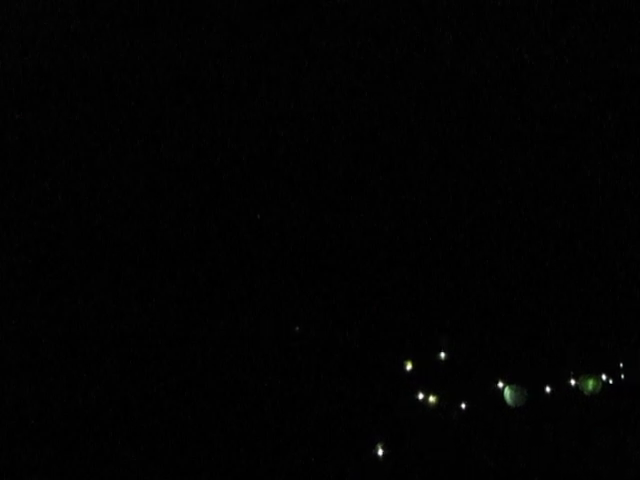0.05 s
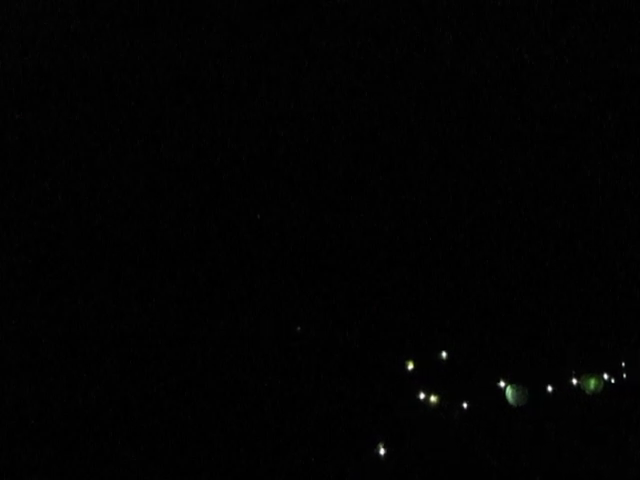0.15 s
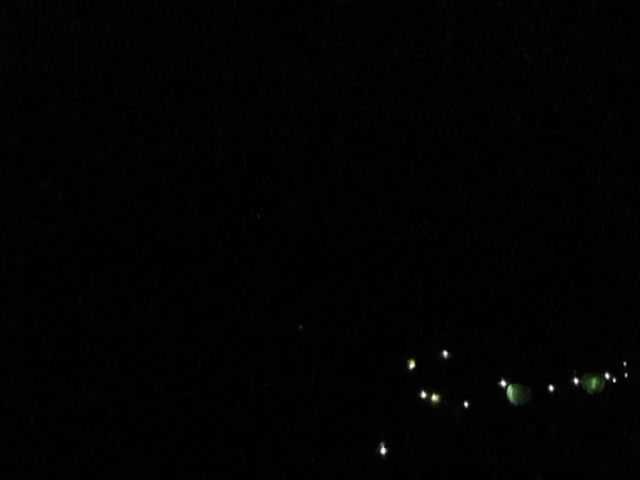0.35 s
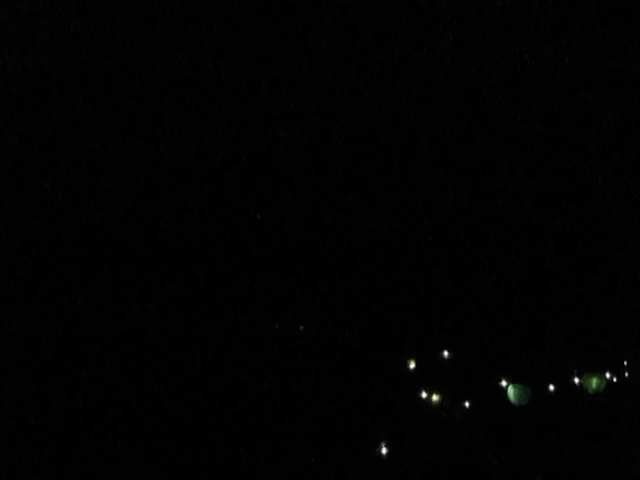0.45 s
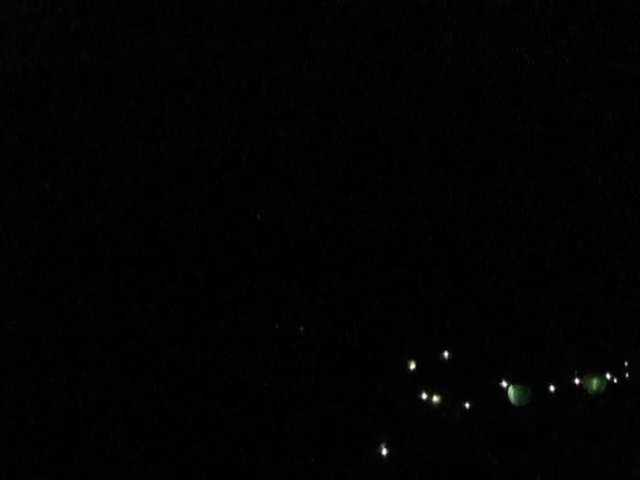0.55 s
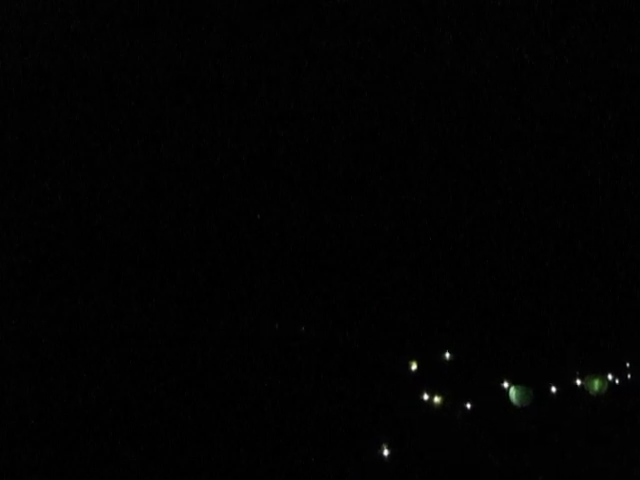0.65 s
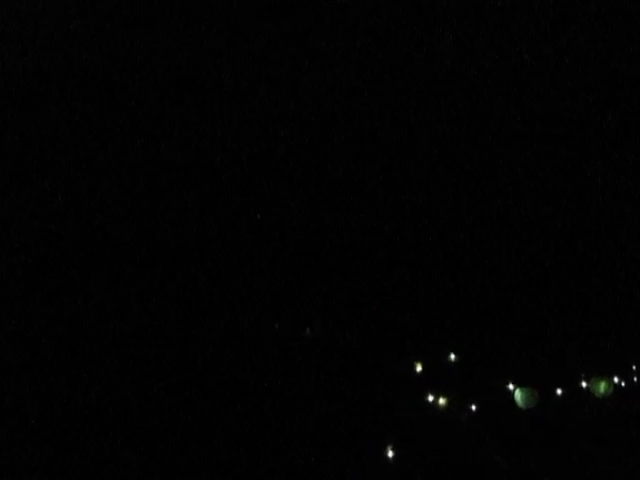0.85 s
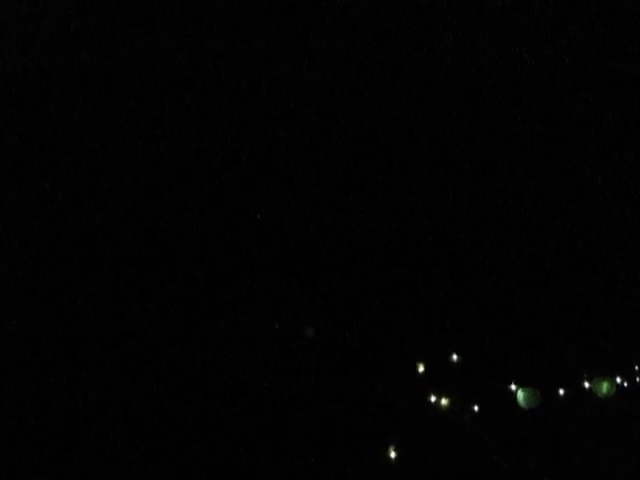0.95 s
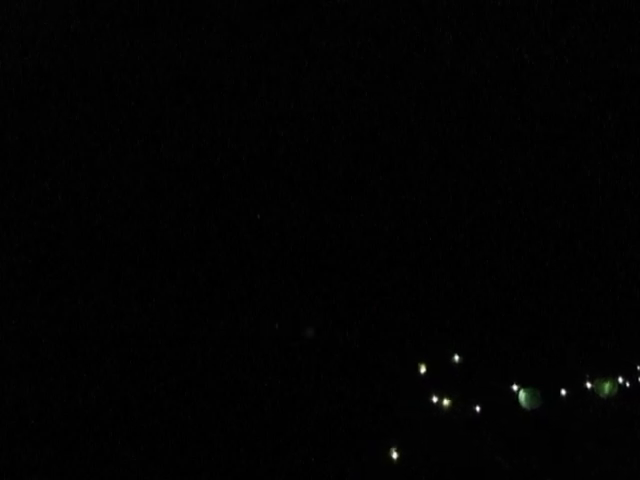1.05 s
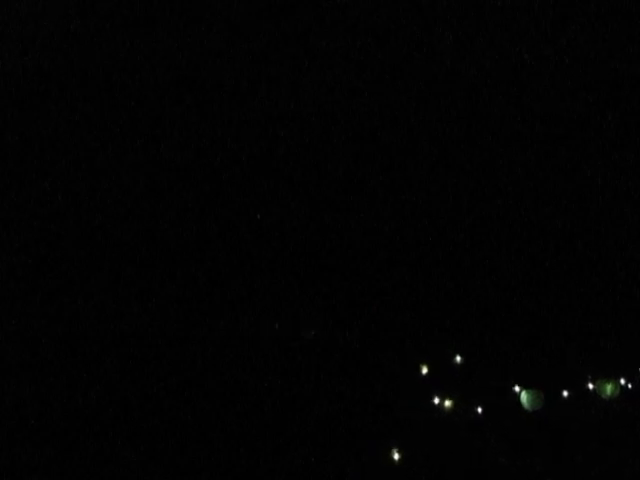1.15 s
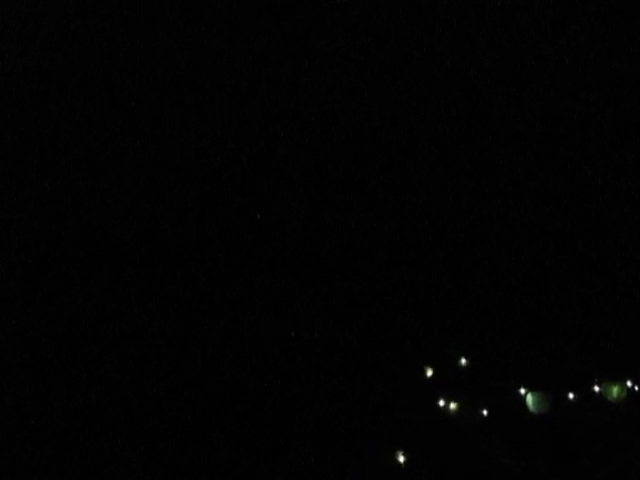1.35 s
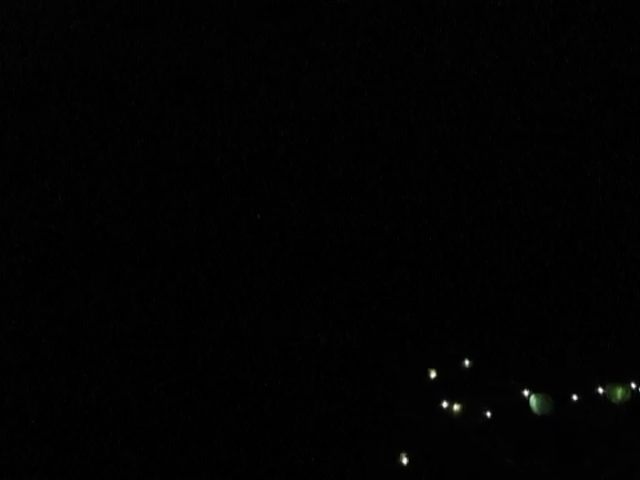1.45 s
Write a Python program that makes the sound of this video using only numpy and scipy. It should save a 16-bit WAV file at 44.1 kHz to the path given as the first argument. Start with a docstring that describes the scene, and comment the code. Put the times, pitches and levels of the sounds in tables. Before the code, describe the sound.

A fox gives one harsh bark outdoors at night, echoing over a faint hiss.

```python
"""A fox barks at night

One harsh bark in the open, a little to the right. The voice scoops up to about 1 kHz, a second,
higher vibration in the throat mixes with it over a rasp, and it ends in a softer whine.
Distant slopes throw the cry back and trees scatter it into a long tail.
Beneath it lie a quiet night hiss, two faint rustles and a tick."""
import sys
import numpy as np
from scipy import signal
from scipy.fft import rfft, irfft, next_fast_len
from scipy.io import wavfile
from scipy.ndimage import map_coordinates

SR = 44100
rng = np.random.default_rng(int(sys.argv[2]) if len(sys.argv) > 2 else 0)


def materialize(psi):
    """Save the field psi as 16-bit PCM at rate SR to the path in sys.argv[1].

    A 1-D psi becomes a single channel; in a 2-D psi each row is a channel.
    """
    bounded = np.clip(np.atleast_2d(psi).T, -1, 1)
    quanta = np.round(bounded * 32767).astype(np.int16)
    wavfile.write(sys.argv[1], SR, quanta)


N = 66150  # 1.5 seconds

# Tone of the night hiss. Each row: frequency in Hz, relative level in dB.
NIGHT_COLOUR = [(20, -1.5), (45, -5), (80, -1.5), (120, -8), (240, -6), (470, -12.5), (750, -11.5),
                (1120, -6.5), (1450, -16.5), (2400, -20), (5000, -23), (9500, -27), (15500, -35.5)]
# How alike the hiss is in both ears. Each row: frequency in Hz, likeness from 0 to 1.
NIGHT_LIKENESS = [(60, .05), (200, 0.37), (500, 0.25), (1050, 0.15), (2000, 0.28), (4000, 0.027),
                  (12000, 0)]
# Where the hiss leans. Each row: frequency in Hz, left minus right in dB.
NIGHT_BALANCE = [(60, 2.5), (300, 1.5), (1000, -1), (4000, 0.6), (12000, .5)]
# Small noises. Each row: peak time and fade time in seconds, pitch in Hz, width in octaves, level in dB.
RUSTLE_BURSTS = [(0.09, 0.038, 3720, 0.7, -64.5), (1.24, 0.039, 11000, .6, -71),
                 (1.484, 0.0015, 11500, .17, -55.5)]
# How long the trees ring. Each row: frequency in Hz, seconds to fade by 60 dB.
TREES_FADE = [(700, 1.45), (1050, 1.23), (1800, 1.14), (2800, 0.99), (4500, 1.19), (9000, 0.77)]
# Tone of that tail. Each row: frequency in Hz, gain in dB.
TREES_TONE = [(700, -2), (1050, 0.024), (1800, 0), (3300, 0), (4500, -3.5), (6300, 9.5), (9000, 3.5)]
# How alike the tail is in both ears. Each row: frequency in Hz, likeness from 0 to 1.
TREES_LIKENESS = [(700, 1), (1100, .88), (1800, 0.75), (2600, 0.025), (4400, 0.091), (9000, 0.22)]
# Far echoes. Each row: delay in seconds, gain in dB, smear in seconds, treble cutoff in Hz.
SLOPE_ECHOES = [(.15, -18, .04, 6000), (.2, -15, .05, 1500), (.385, -19.5, .04, 1510), (.66, -31, .1, 1600),
                (.86, -39.5, .05, 2200)]
# The main voice. Each row: time in seconds, pitch in Hz, level in dB.
VOICE_PATH = [(.2, 804.6, -60), (.218, 849, -34.5), (.234, 923.7, -39.5), (.25, 1002, -30), (.27, 996, -32),
              (.292, 1012, -26), (.345, 1047, -30), (.385, 1083, -39.5), (.41, 1094, -44.5),
              (.455, 1101, -42.5), (.492, 1071, -38), (.545, 1047, -34), (.585, 1035, -55)]
# The higher vibration. Each row: time in seconds, pitch in Hz, level in dB.
WHISTLE_PATH = [(.222, 1735, -48), (.24, 1771, -41), (.253, 1769, -29.5), (.29, 1794, -30.5),
                (.318, 1790, -28.5), (.345, 1799, -45.5), (.36, 1809, -34), (.402, 1797, -37),
                (.425, 1760, -45)]
# Overtones and mixing tones. Each row: the multiples of voice, whistle and growl pitch to add up.
MIX_RECIPES = [(2, 0, 0), (1, 1, 0), (3, 0, 0), (1, 0, -1), (0, 1, -1), (0, 1, -2), (1, 1, -2), (0, 2, -1),
               (1, 2, -2), (1, 2, -1)]
# The gain in dB of each of those tones.
MIX_GAINS = [-18.5, -11.5, -19.5, -18, -13, -13, -17, -27, -20.5, -22]
# The throat's rasp. Each row: time in seconds, level in dB, extra treble in dB.
RASP_PATH = [(.2, -61, -18), (.216, -44.5, 0), (.235, -34, -6), (.265, -33.5, 3), (.31, -34, 1.5),
             (.36, -33, 1.5), (.4, -30, -7), (.44, -38, -2), (.47, -42.5, 1)]
# Tone of the rasp. Each row: frequency in Hz, relative level in dB.
THROAT_COLOUR = [(300, -67), (620, -32.5), (730, -13.5), (850, 0.5), (960, 0.5), (1120, 2), (1270, -1),
                 (1460, -7.5), (1680, 1), (1900, 2), (2150, -2), (2400, -7), (2900, -6), (3200, -9),
                 (3800, -8), (4450, -16.5), (4850, -21), (5800, -30.5), (7500, -51.5), (14000, -69)]
# Where the cry leans. Each row: frequency in Hz, left minus right in dB.
CRY_BALANCE = [(800, 1), (1100, 0.6), (1800, -2), (2800, -2), (4400, 0.5)]
# How far the right ear is ahead. Each row: frequency in Hz, lead in radians.
RIGHT_LEAD = [(700, .22), (1050, 0.37), (1800, 0.41), (4400, 0.81)]


def amp(db):
    """Turn decibels into a gain."""
    return 10 ** (np.asarray(db) / 20)


def unit(x):
    """Scale a sound to an average power of 1."""
    return x / np.sqrt(np.mean(x ** 2) + 1e-20)


def along(points, hz):
    """Read between a table's rows on a log frequency scale."""
    freqs, values = np.transpose(points)
    return np.interp(np.log(hz + 1), np.log(freqs + 1), values)


def curves(rows):
    """One value per sample for each column after the time."""
    times, *columns = np.transpose(rows)
    return [np.interp(np.arange(N) / SR, times, column) for column in columns]


def gate(rows, attack_s=0.0098, release_s=0.03):
    """Fade in before the first row's time and out after the last."""
    t = np.arange(N) / SR
    return np.exp(np.minimum(t - rows[0][0], 0) / attack_s - np.maximum(t - rows[-1][0], 0) / release_s)


def wobble(per_second=240):
    """A smooth, quickly changing random curve."""
    return map_coordinates(rng.standard_normal(N // 8), [np.arange(N) * per_second / SR], mode="wrap")


def filtered(x, response):
    """Give each frequency the gain that response returns for it."""
    size = next_fast_len(N + SR // 2)
    return irfft(rfft(x, size) * response(np.fft.rfftfreq(size, 1 / SR)), size)[..., :N]


def panned(points, hz):
    """Left and right gains for a level difference."""
    return amp(np.outer([.5, -.5], along(points, hz)))


def noise_pair(likeness):
    """White stereo noise with a given likeness of left and right."""
    def shares(hz):
        angle = np.arccos(np.clip(along(likeness, hz), -1, 1)) / 2
        return np.array([np.cos(angle), np.sin(angle)])
    mid, side = filtered(rng.standard_normal((2, N)), shares)
    return np.array([mid + side, mid - side])


def night(level_db=-54):
    """The steady hiss and low murmur of the countryside."""
    colour = lambda hz: amp(along(NIGHT_COLOUR, hz)) * panned(NIGHT_BALANCE, hz)
    return unit(filtered(noise_pair(NIGHT_LIKENESS), colour)) * amp(level_db)


def rustles():
    """Soft bursts of noise close by; the shortest is a tick."""
    t, out = np.arange(N) / SR, np.zeros((2, N))
    for peak_s, fade_s, centre_hz, octaves, db in RUSTLE_BURSTS:
        band = lambda hz: np.exp(-(np.log2((hz + 1) / centre_hz) / octaves) ** 2)
        hiss = unit(filtered(rng.standard_normal((2, N)), band))
        out += hiss * amp(db) * np.exp(-((t - peak_s) / fade_s) ** 2)
    return out


def slopes(cry, copies=5):
    """Each far slope returns a dull cluster of copies of the cry."""
    out = np.zeros(N)
    sizes = np.exp(-np.arange(copies) / 2)
    for delay, db, smear, dull_hz in SLOPE_ECHOES:
        lags = delay + smear * (np.arange(copies) + rng.random(copies)) / copies
        cluster = lambda hz: sizes @ np.exp(-2j * np.pi * np.outer(lags, hz)) / np.linalg.norm(sizes)
        out += amp(db) * filtered(cry, lambda hz: cluster(hz) / np.sqrt(1 + (hz / dull_hz) ** 6))
    return out


def trees(cry, gain_db=-6.5, build_s=0.012):
    """Trees scatter the cry into a smooth tail whose treble dies first."""
    hz, t, bands = signal.stft(noise_pair(TREES_LIKENESS), SR, nperseg=256)
    fade = amp(-60 * t / along(TREES_FADE, hz)[:, None])
    build = 1 - np.exp(-t / build_s)
    tail = signal.istft(bands * fade * build, SR, nperseg=256)[1][:, :N]
    tail = filtered(tail / np.linalg.norm(tail[0]), lambda hz: amp(along(TREES_TONE, hz)))
    return amp(gain_db) * signal.fftconvolve(cry[None], tail, axes=1)[:, :N]


def unsteady_phase(hz, jitter):
    """The running angle of a vibration whose pitch wavers by the share jitter."""
    return 2 * np.pi * np.cumsum(hz * (1 + jitter * wobble())) / SR


def vibration(rows, shimmer_db=1.55):
    """Phase and size of one unsteady vibration in the throat."""
    hz, db = curves(rows)
    phase = unsteady_phase(hz, jitter=0.0091)
    return phase, np.sqrt(2) * amp(db + shimmer_db * wobble()) * gate(rows)


def rasp(voice_phase, pulsing=0.79, flutter_db=0.5, treble_hz=2600):
    """Noise in the throat that puffs once per cycle of the voice."""
    puffs = rng.standard_normal(N) * (1 + pulsing * np.cos(voice_phase)) * amp(flutter_db * wobble())
    breath = unit(filtered(puffs, lambda hz: amp(along(THROAT_COLOUR, hz))))
    body = filtered(breath, lambda hz: 1 / (1 + (hz / treble_hz) ** 6))
    level_db, treble_db = curves(RASP_PATH)
    return (body + amp(treble_db) * (breath - body)) * amp(level_db) * gate(RASP_PATH)


def fox():
    """Two vibrations and a slow growl mix into a cluster of tones over the rasp."""
    voice, voice_size = vibration(VOICE_PATH)
    whistle, whistle_size = vibration(WHISTLE_PATH)
    growl = unsteady_phase(hz=168, jitter=.08)  # slow flapping of the throat
    tones = voice_size * np.sin(voice) + whistle_size * np.sin(whistle)
    for (n_voice, n_whistle, n_growl), db in zip(MIX_RECIPES, MIX_GAINS):
        size = (voice_size ** n_voice * whistle_size ** n_whistle) ** (1 / (n_voice + n_whistle))
        tones += amp(db) * size * np.sin(n_voice * voice + n_whistle * whistle + n_growl * growl)
    return tones + rasp(voice)


def scene():
    """The cry and its echoes reach the right ear first, over the quiet night."""
    cry = fox()
    outdoors = cry + slopes(cry) + trees(cry)
    lead = lambda hz: np.exp(1j * np.outer([-.5, .5], along(RIGHT_LEAD, hz)))
    placed = filtered(outdoors, lambda hz: panned(CRY_BALANCE, hz) * lead(hz))
    return placed + night() + rustles()


def record(dry, top_hz=15720):
    """Cut away the very highest treble."""
    return filtered(dry, lambda hz: hz < top_hz)


dry = scene()
out = record(dry)
materialize(out)
```